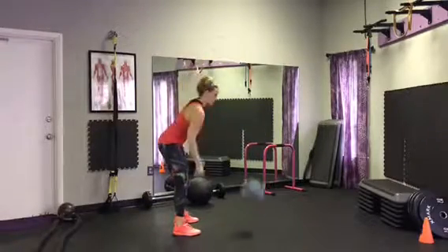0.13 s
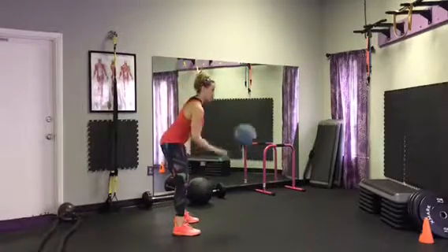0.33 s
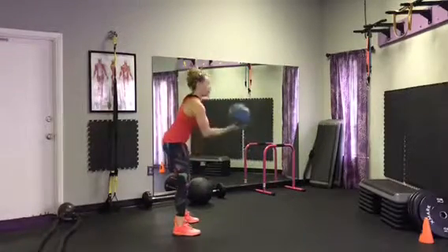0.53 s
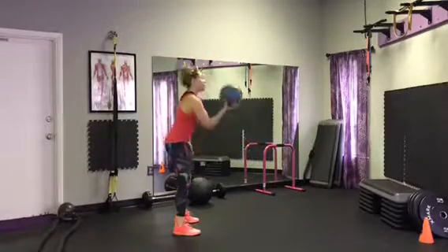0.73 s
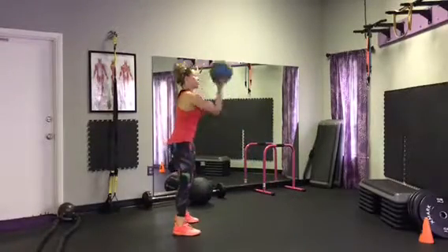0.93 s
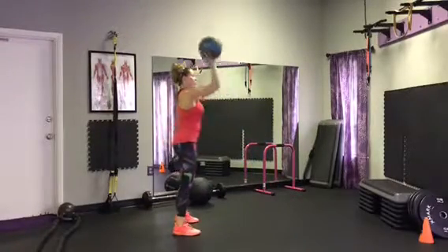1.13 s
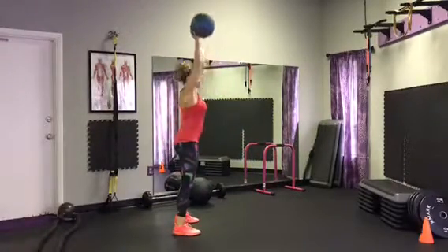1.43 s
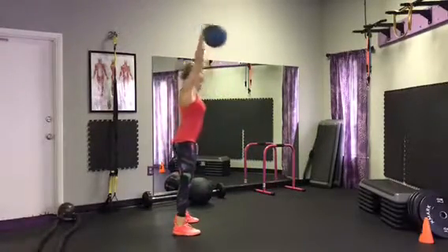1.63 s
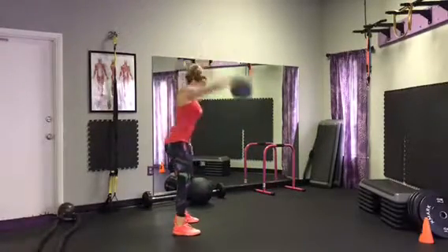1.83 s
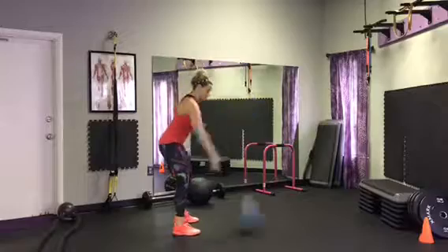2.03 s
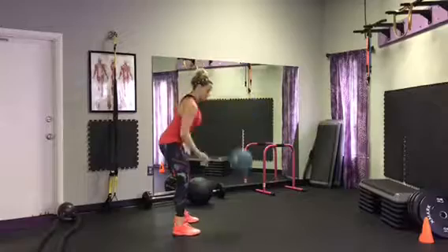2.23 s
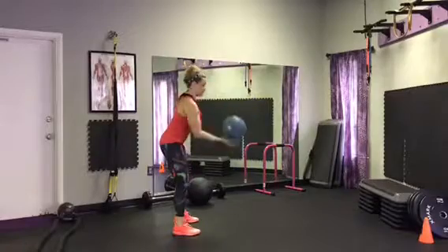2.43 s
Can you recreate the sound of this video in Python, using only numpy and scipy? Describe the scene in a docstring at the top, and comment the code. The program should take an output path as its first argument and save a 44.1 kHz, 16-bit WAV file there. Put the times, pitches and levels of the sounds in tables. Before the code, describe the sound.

A heavy medicine ball slams twice on a gym floor and is caught each time.

```python
"""A heavy rubber medicine ball is slammed twice on the floor of a small, live gym and caught each time.
Each slam is a puff of squeezed air, one sharp slap and a short hollow ring; near walls throw it back,
the room booms and rings out. A faint hiss hangs over the rebound. Hands brush the ball as it leaves
and pat it as it returns, clothes rustle, and ventilation hums faintly underneath."""
import sys
import numpy as np
from scipy import signal
from scipy.fft import rfft, irfft, next_fast_len
from scipy.io import wavfile
from scipy.ndimage import map_coordinates

SR = 44100
rng = np.random.default_rng(int(sys.argv[2]) if len(sys.argv) > 2 else 0)


def file_out(sig):
    """Save sig as 16-bit WAV at sys.argv[1]."""
    # one column per channel
    cols = np.atleast_2d(sig).T
    # limit, then scale
    lim = np.clip(cols, -1, 1)
    pcm = np.round(lim * 32767).astype(np.int16)
    wavfile.write(sys.argv[1], SR, pcm)


N = 114660
T = np.arange(N) / SR
FFT_SIZE = next_fast_len(N + SR)
FREQS = np.fft.rfftfreq(FFT_SIZE, 1 / SR)

# The ball's hits on the floor: start_s, level_db, brightness_db
FLOOR_HITS = [(.2185, 0, 0), (2.1908, 0, .5)]


def slams():
    """Rubber slaps the floor and crackles as it flattens; ring, echoes, tail and boom follow."""
    # Tone of the slap: freq_hz, gain_db
    slap_eq = [(25, -13.5), (60, 21.5), (160, 19.5), (350, 27.5), (600, 22.5), (1100, 20.5), (1800, 11.5),
               (3000, 9.5), (4500, 2), (7000, 1), (12000, -4.5), (16000, -6)]
    lag_cycles, lag_knee_hz = 1.5, 500  # the contact spreads, so lower tones leave later
    crack_db, crack_from_hz = 2.5, 3500  # the straight path keeps more treble
    same_spot_hz = 900  # below this, slams on one spot wake the same tail
    spread = np.exp(-2j * np.pi * lag_cycles * np.log(1 + FREQS / lag_knee_hz))
    slap = causal(along(slap_eq, FREQS)) * spread
    direct = amp(crack_db * FREQS ** 2 / (FREQS ** 2 + crack_from_hz ** 2))
    walls = wall_echoes()
    body = hollow_ring() + room_boom()
    crossover = np.arctan((FREQS / same_spot_hz) ** 2)
    lows, highs = np.cos(crossover), np.sin(crossover)
    shared_tail = room_tail()
    mix = 0
    for start_s, level_db, brightness_db in FLOOR_HITS:
        crackle = amp(-5.5) * rfft(burst(decay_s=.0026), FFT_SIZE) * highs
        tail = lows * shared_tail + highs * room_tail()
        hit = slap * (direct + crackle + walls + tail) + body
        mix += amp(level_db + brightness_db * highs ** 2) * delay(start_s) * hit
    return irfft(mix, FFT_SIZE)[:N]


def hollow_ring():
    """Spectrum of ball and floor ringing briefly after the blow."""
    # Resonances: pitch_hz, relative_db, t60_s
    ring_modes = [(252, -31, .6), (303, -25, .6), (322, -25, .35), (350, -31, .7), (371, -25, .55),
                  (434, -21, .3), (458, -25, .25), (524, -30, .45), (586, -30, .45), (703, -26, .4),
                  (760, -30, .5), (781, -29, .55), (894, -26, .45), (968, -28, .55), (1033, -30, .35),
                  (1092, -29, .45), (1226, -31, .45), (1266, -32, .45)]
    return amp(-2) * ringing(ring_modes, rise_s=.0059)


def air_puffs():
    """Air escapes ever faster from under the ball, peaking just before it lands."""
    # Tone of the puff: freq_hz, gain_db
    puff_eq = [(50, -9.5), (400, 0), (1200, -1), (2500, -25), (6000, -39.5), (16000, -49.5)]
    lead_s, slope_s = .0008, .0018
    envelope = sum(amp(level_db - 29) * np.exp(-abs(T - start_s + lead_s) / slope_s)
                   for start_s, level_db, _ in FLOOR_HITS)
    return noise(puff_eq) * envelope


def catches():
    """Palms and fingers land one after another, each a short burst coloured by the cupped hand."""
    # Hands meeting the ball: start_s, level_db, decay_s, tilt_db_per_octave
    pats = [(0.6258, -6, 0.0036, 0), (0.6336, -2, 0.0042, -1), (0.6417, -6.5, 0.0062, 2),
            (2.5898, -11.5, 0.0046, 2), (2.5935, -7.5, 0.0096, 0)]
    # Tone of a pat: freq_hz, gain_db
    pat_eq = [(60, -13), (170, -9), (330, -3), (700, -5), (1300, -1), (1650, -3), (1950, 1.5), (2300, 2.5),
              (2700, -6), (3300, -6), (4300, -16), (6500, -16), (8500, -11), (10200, -15), (11500, -11),
              (15500, -15)]
    tilt_knee_hz = 2055
    octaves = np.log2(1 + FREQS / tilt_knee_hz)
    mix = np.zeros(N)
    for start_s, level_db, decay_s, tilt in pats:
        colour = causal(along(pat_eq, FREQS) + tilt * octaves)
        room = 1 + amp(-1) * room_tail(t60_scale=.93)  # a light pat dies a little sooner than a slam
        mix += amp(level_db) * filtered(burst(decay_s), colour * delay(start_s) * room)
    return mix


def wall_echoes():
    """Response of ceiling and near walls: quick, slightly dulled reflections."""
    # First echoes: delay_s, level_db
    echoes = [(.0066, -8), (.0092, -3), (.0114, -15), (.0162, -10), (.0195, -15)]
    dull_hz = 14000
    return sum(amp(db) * delay(delay_s) for delay_s, db in echoes) / (1 + 1j * FREQS / dull_hz)


def room_boom():
    """Spectrum of the low standing waves that build between the walls."""
    # Room modes: pitch_hz, level_db, t60_s
    boom_modes = [(60.7, -12, 0.31), (53, -25.5, .45), (64.3, -25.5, 0.51), (72, -29.5, 0.98),
                  (76, -34, .6), (92.1, -28.5, 0.79), (110.7, -31.5, 0.24), (129.4, -27.5, .5)]
    return ringing(boom_modes, rise_s=.022) * delay(.002)


def room_tail(t60_scale=1):
    """Response of one diffuse tail; every frequency dies at its own speed."""
    # Reverb time of a slam: freq_hz, t60_s
    decay_times = [(60, .62), (150, 0.77), (350, 0.87), (900, 0.78), (2400, 0.81), (6000, 0.76),
                   (10000, .52), (15000, 0.3)]
    # Tone of the tail: freq_hz, gain_db
    tail_eq = [(40, -11), (100, -7), (170, 0), (270, -0.5), (400, -1), (800, 0.5), (1300, 2.5), (2500, -1),
               (6000, 3), (10000, 1), (15000, -0.5)]
    gap_s, build_s = .005, .0043
    early_db, early_s = -6.5, .052  # denser scatter at the start of the tail
    hz, t, bands = signal.stft(rng.standard_normal(N), SR, nperseg=256)
    t60_s = t60_scale * along(decay_times, hz)[:, None]
    wash = signal.istft(bands * amp(-60 * t / t60_s), SR)[1][:N]
    attack = 1 - np.exp(-np.maximum(T - gap_s, 0) / build_s)
    early_lift = 1 + amp(early_db) * np.exp(-T / early_s)
    tail = wash * attack * early_lift
    return rfft(tail / np.linalg.norm(tail), FFT_SIZE) * amp(along(tail_eq, FREQS))


def rebound_hiss():
    """A faint high hiss holds while the ball flies back up, then fades."""
    # Tone of the hiss: freq_hz, gain_db
    hiss_eq = [(3000, -30.5), (7000, -6.5), (10500, -1), (12000, -1), (16000, -3.5)]
    hold_s, fade_s = .41, .04
    envelope = sum((T > start_s) * np.exp(-np.maximum(T - start_s - hold_s, 0) / fade_s)
                   for start_s, _, _ in FLOOR_HITS)
    return amp(-69.5) * envelope * noise(hiss_eq)


def hand_brushes():
    """Skin slides on rubber as the ball leaves the hands."""
    # Releases: peak_s, level_db, half_width_s
    releases = [(0.134, -68.5, 0.029), (2.105, -69, 0.025)]
    # Tone of skin on rubber: freq_hz, gain_db
    skin_eq = [(200, -8), (1500, 2), (4000, -1), (9000, -2), (14000, 1), (16000, -2)]
    return rubbing(releases, skin_eq)


def clothes_rustle():
    """Cloth rubs during the throw and the lift."""
    # Movements: peak_s, level_db, half_width_s
    moves = [(.12, -69.5, 0.075), (1.1, -77, 0.14), (1.47, -75.5, 0.1)]
    # Tone of the cloth: freq_hz, gain_db
    cloth_eq = [(100, 0.5), (500, 3.5), (1500, 3), (3000, -2.5), (5500, -11), (8000, -21), (16000, -25)]
    return rubbing(moves, cloth_eq)


def ventilation():
    """A steady bed of air noise with a few wavering hum lines."""
    # Tone of the moving air: freq_hz, gain_db
    air_eq = [(12, -51), (20, -27.5), (30, -9), (55, 2.5), (81, -12.5), (150, -16), (204, -22),
              (241, -18.5), (319, -21), (357, -28), (459, -29.5), (1260, -34), (1570, -37), (2670, -41.5),
              (16000, -50)]
    # Hum lines: pitch_hz, level_db
    hum_lines = [(53.8, -66.5), (75, -72), (119, -78), (144, -74.5), (241, -74), (359, -79)]
    waver_depth, knots_per_s = .83, 14
    hum = 0
    for pitch_hz, level_db in hum_lines:
        waver = 1 + waver_depth * (wobble(knots_per_s) + 1j * wobble(knots_per_s))
        hum += amp(level_db) * unit(np.real(waver * np.exp(2j * np.pi * pitch_hz * T)))
    return hum + amp(-56) * noise(air_eq)


def rubbing(strokes, eq):
    """Bell-shaped swells of friction noise with their room tail."""
    swells = sum(amp(db) * np.exp(-.5 * ((T - peak_s) / half_s) ** 2) for peak_s, db, half_s in strokes)
    return filtered(noise(eq) * swells, 1 + amp(-1.5) * room_tail())


def ringing(modes, rise_s):
    """Spectrum of damped sines that swell in together."""
    swell = 1 - np.exp(-(T / rise_s) ** 2)
    tones = sum(amp(db - 60 * T / t60_s) * np.sin(2 * np.pi * hz * T) for hz, db, t60_s in modes)
    return rfft(swell * tones, FFT_SIZE)


def burst(decay_s, rise_s=.00023):
    """A short noise burst of energy 1."""
    x = rng.standard_normal(N) * (1 - np.exp(-T / rise_s)) * np.exp(-T / decay_s)
    return x / np.linalg.norm(x)


def noise(eq):
    """Coloured noise of rms 1."""
    return unit(filtered(rng.standard_normal(N), amp(along(eq, FREQS))))


def wobble(knots_per_s):
    """A smooth random curve."""
    return map_coordinates(rng.standard_normal(256), [T * knots_per_s], mode="wrap")


def causal(gain_db):
    """Minimum-phase response with the given gain per frequency."""
    cepstrum = irfft(gain_db * np.log(10) / 20, FFT_SIZE)
    cepstrum[1:FFT_SIZE // 2] *= 2
    cepstrum[FFT_SIZE // 2 + 1:] = 0
    return np.exp(rfft(cepstrum))


def delay(seconds):
    """Response of a plain delay."""
    return np.exp(-2j * np.pi * FREQS * seconds)


def filtered(x, response):
    """Apply a frequency response."""
    return irfft(rfft(x, FFT_SIZE) * response, FFT_SIZE)[:N]


def along(points, hz):
    """Read a curve of (freq_hz, value) points on a log frequency axis."""
    freqs, values = np.transpose(points)
    return np.interp(np.log(hz + 1), np.log(freqs + 1), values)


def amp(db):
    """Decibels to gain."""
    return 10 ** (np.asarray(db) / 20)


def unit(x):
    """Scale to rms 1."""
    return x / np.sqrt(np.mean(x ** 2) + 1e-20)


def scene():
    """Ball, thrower and ventilation, heard in mono from across the room."""
    ball = slams() + air_puffs() + rebound_hiss() + catches()
    return (ball + hand_brushes() + clothes_rustle() + ventilation())[None]


def record(dry):
    """The microphone drops the deepest bass, colours the treble and cuts the very top."""
    # Tone of the microphone: freq_hz, gain_db
    mic_eq = [(30, -0.5), (9500, -1.5), (10700, -2), (12000, 1.5), (16000, 0.5)]
    low_cut_hz, high_cut_hz = 47, 15900
    thinned = signal.sosfilt(signal.butter(4, low_cut_hz, "high", fs=SR, output="sos"), dry)
    high_cut = 1 / np.sqrt(1 + (FREQS / high_cut_hz) ** 160)
    return np.array([filtered(channel, amp(along(mic_eq, FREQS)) * high_cut) for channel in thinned])


dry = scene()
out = record(dry)
file_out(out)
```